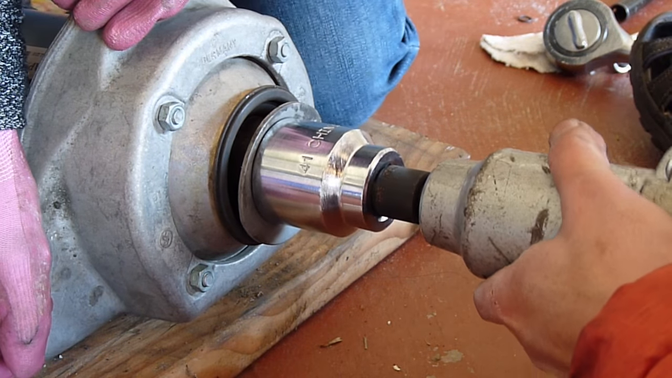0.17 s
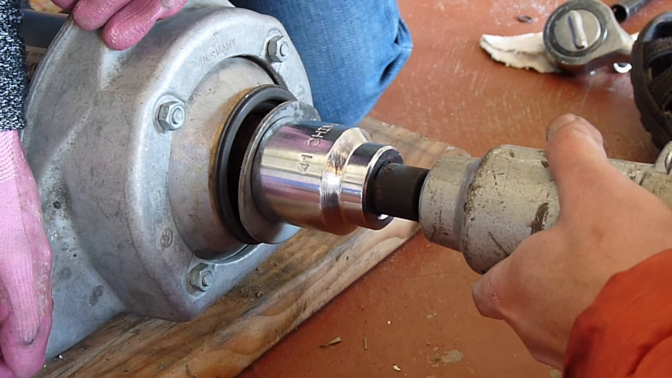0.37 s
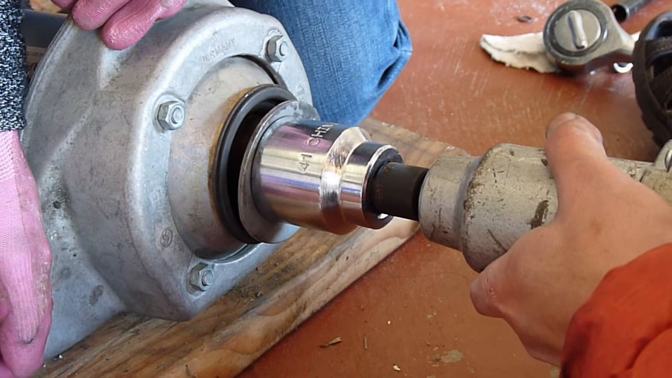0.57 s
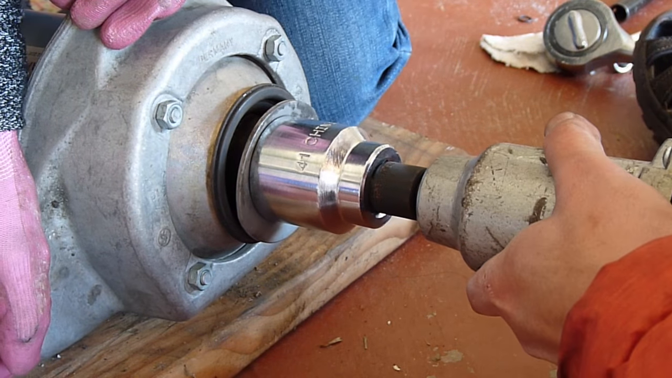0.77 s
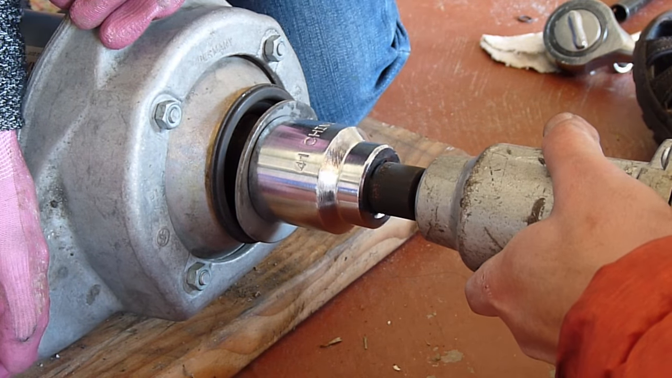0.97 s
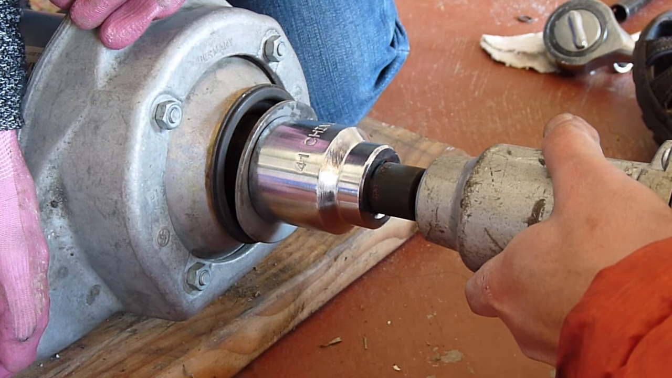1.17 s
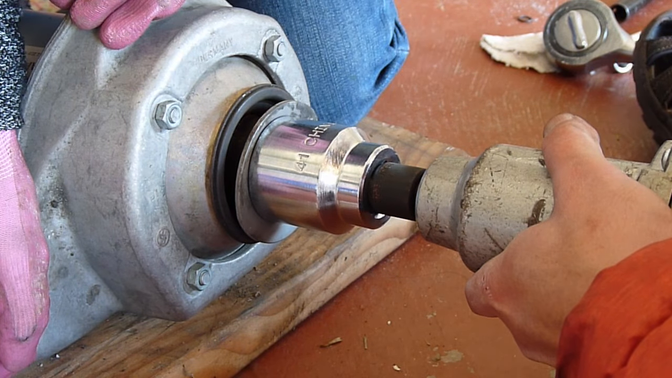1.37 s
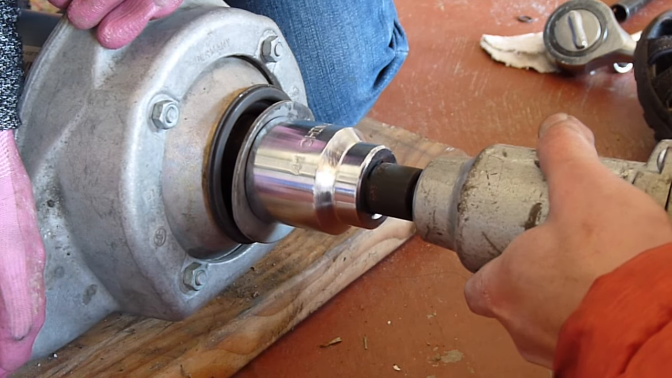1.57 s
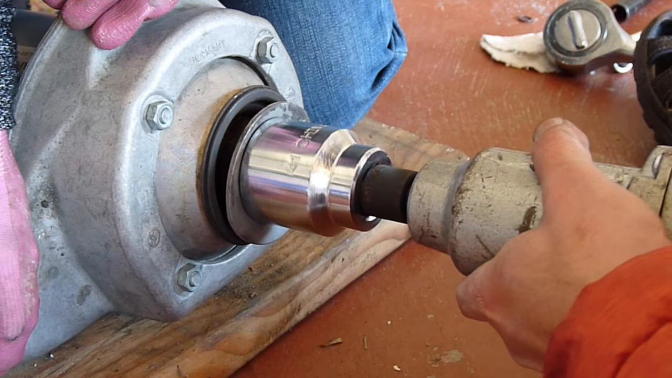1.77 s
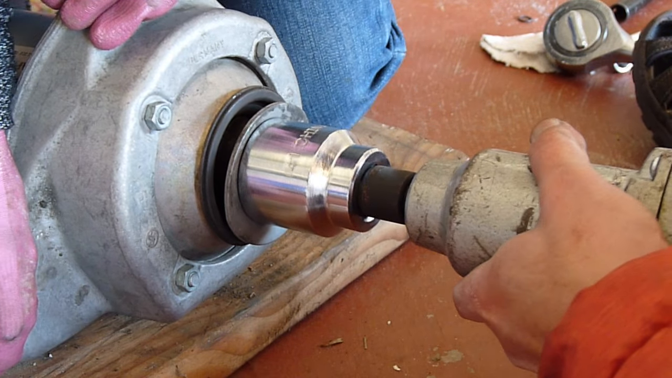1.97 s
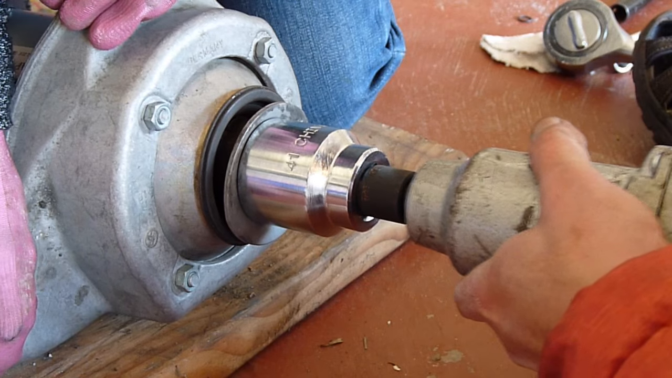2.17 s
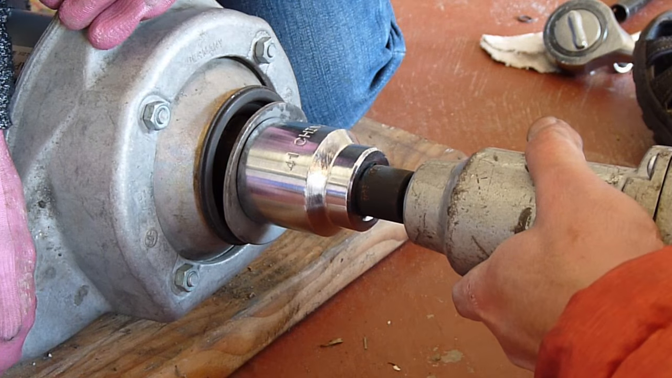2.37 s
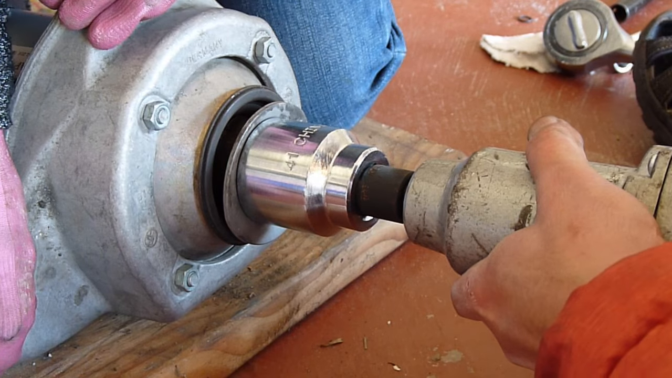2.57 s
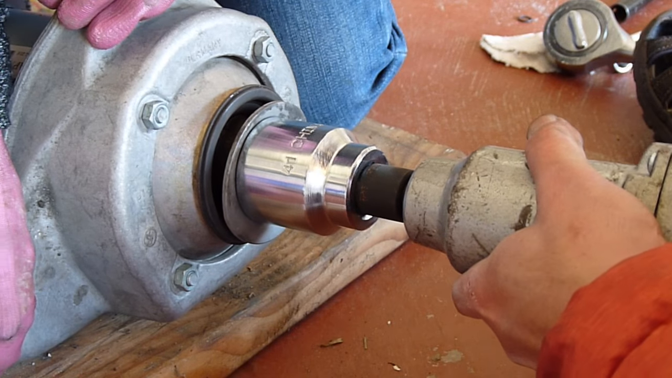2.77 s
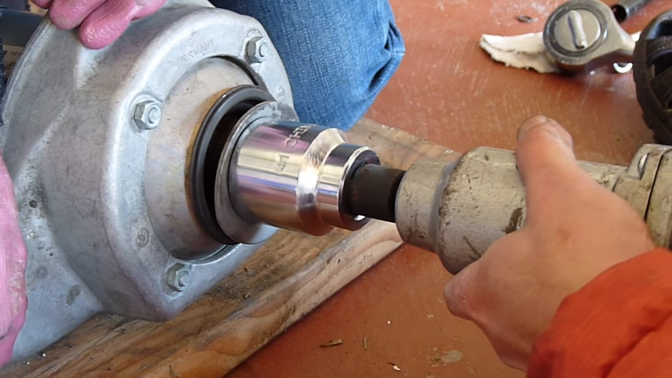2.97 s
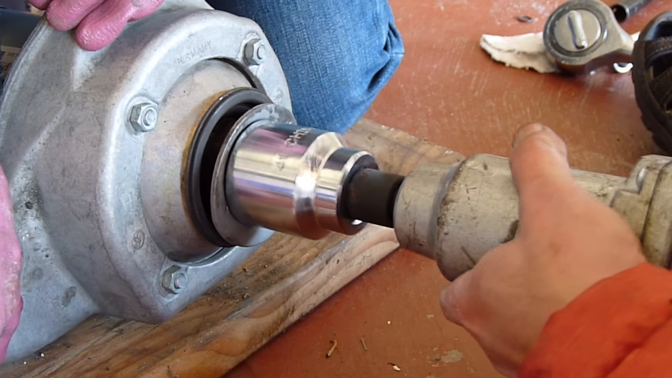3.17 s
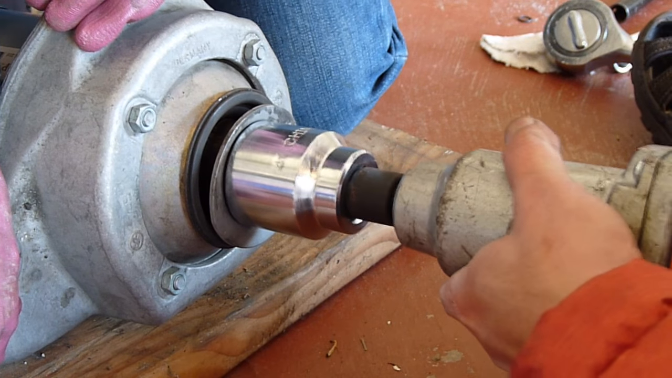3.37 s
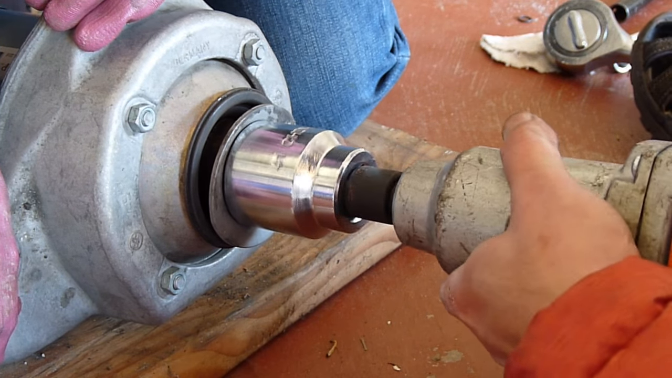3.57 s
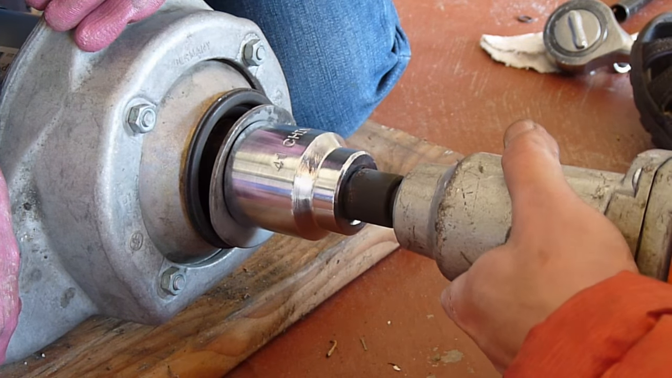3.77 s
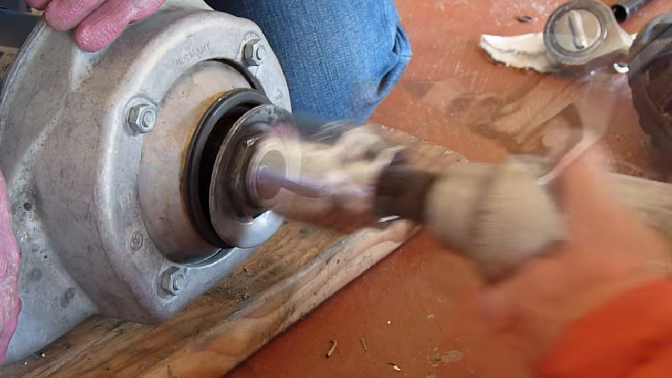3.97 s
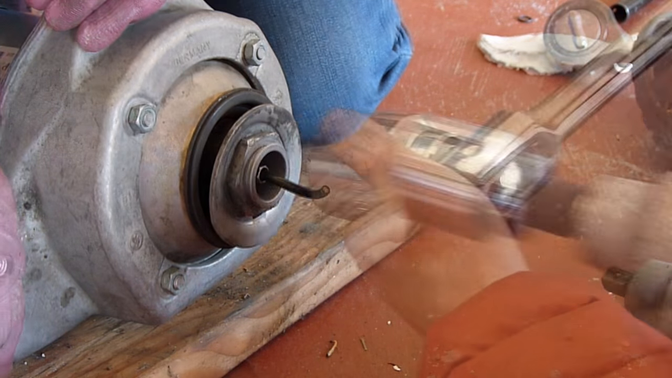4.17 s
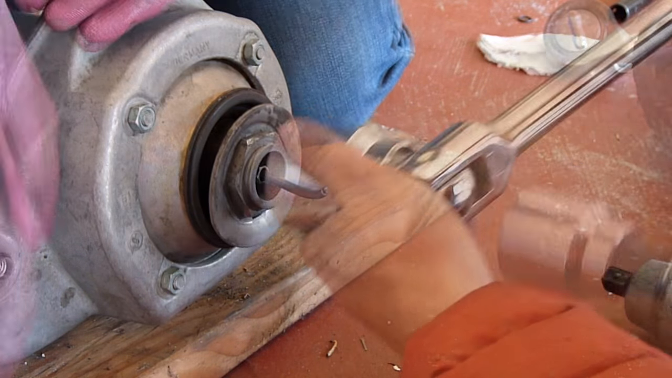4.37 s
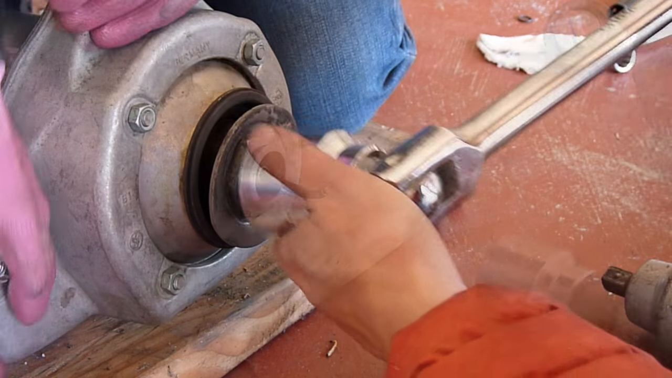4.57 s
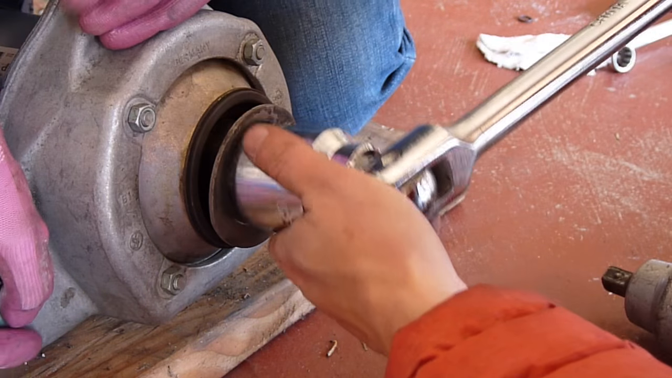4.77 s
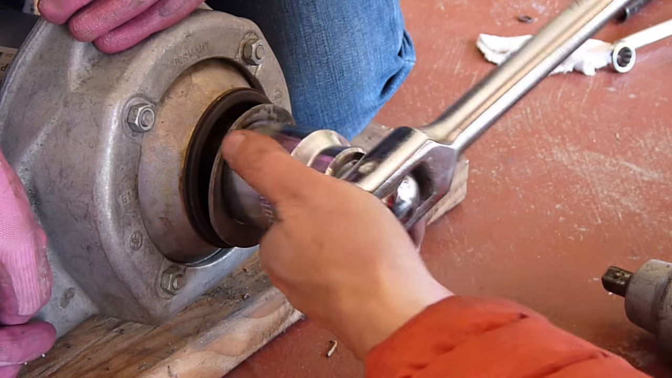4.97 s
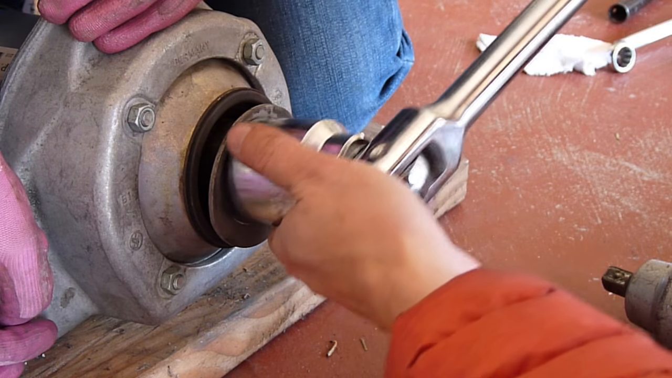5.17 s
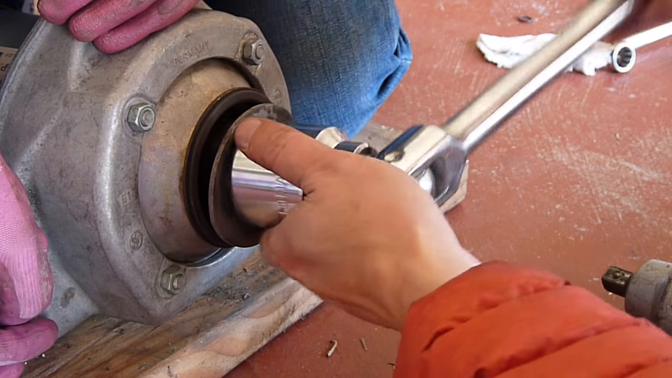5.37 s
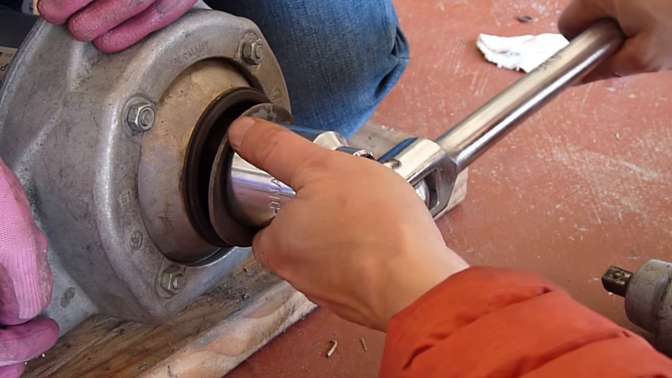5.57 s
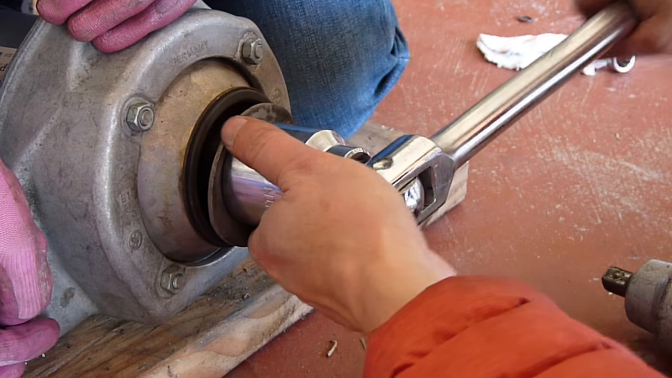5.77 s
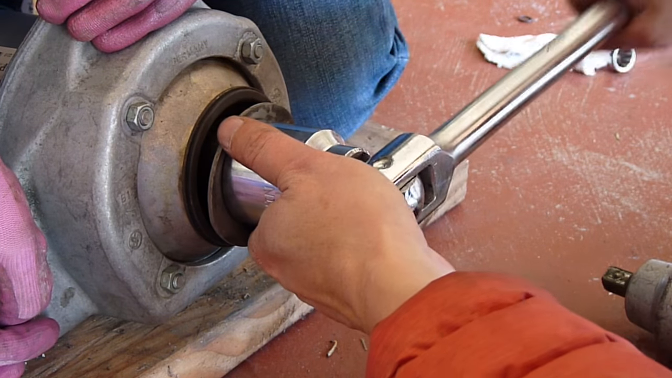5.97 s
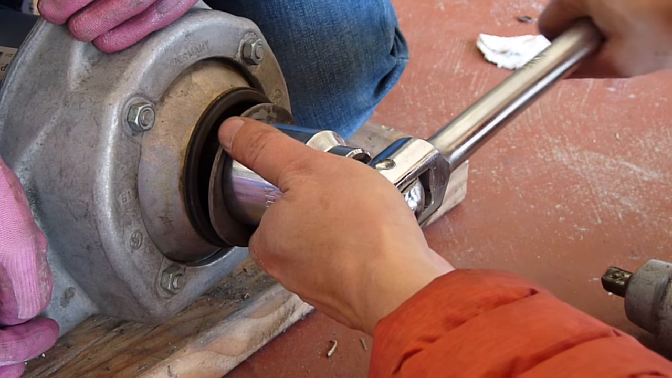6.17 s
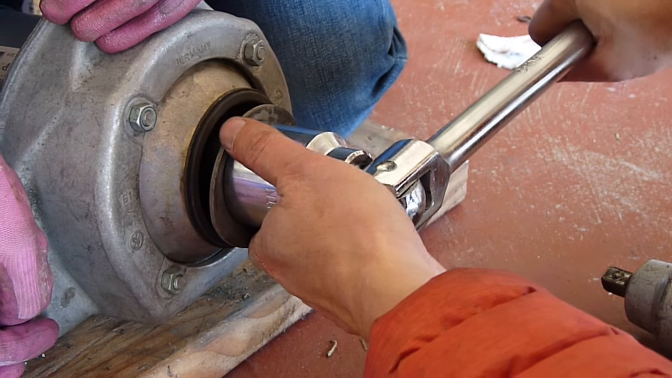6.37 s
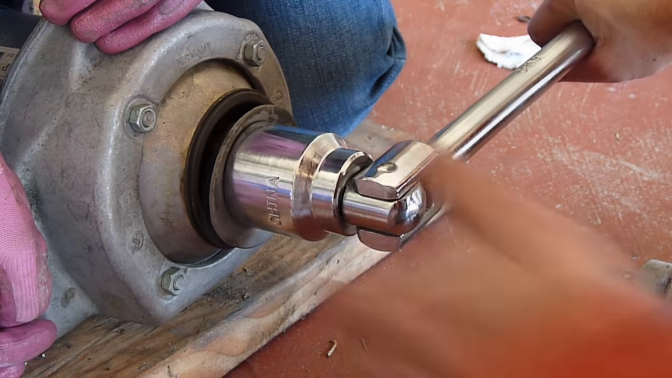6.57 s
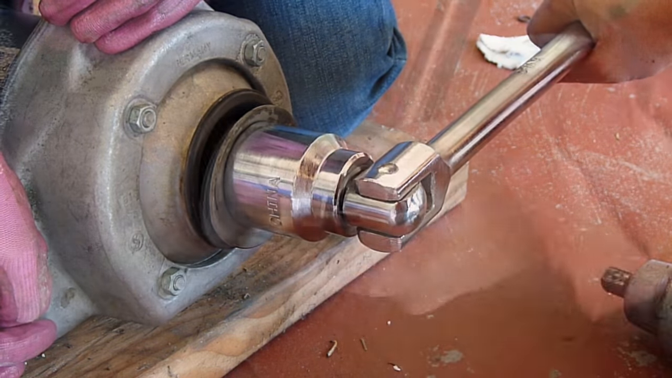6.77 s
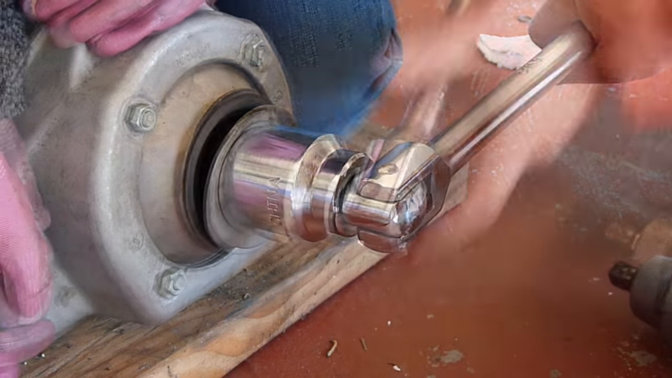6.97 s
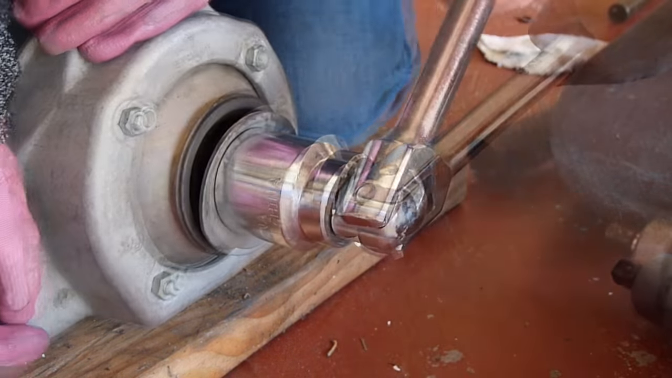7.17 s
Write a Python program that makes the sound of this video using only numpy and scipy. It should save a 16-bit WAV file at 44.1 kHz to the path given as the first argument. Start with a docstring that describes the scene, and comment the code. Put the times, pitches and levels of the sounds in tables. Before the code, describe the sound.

An impact wrench hammers a large nut in two slowing bursts, then a socket on a steel bar clicks lightly.

```python
"""Impact wrench and hand socket

An impact wrench hammers the big nut of a cast gear housing in two bursts, each running down to
single knocks. A socket on a hinged bar is then fitted and clicks as it turns; a sleeve rustles.
A rumble of distant traffic ducks as the wrench starts and ends in a low thud.
The small, dull microphone thumps with each blow and chokes on the hardest."""
import sys
import numpy as np
from scipy import signal
from scipy.fft import rfft, irfft
from scipy.io import wavfile
from scipy.ndimage import uniform_filter1d

SR = 44100
rng = np.random.default_rng(int(sys.argv[2]) if len(sys.argv) > 2 else 0)


def file_out(sig):
    """Save sig as 16-bit WAV at sys.argv[1]."""
    # one column per channel
    cols = np.atleast_2d(sig).T
    # limit, then scale
    lim = np.clip(cols, -1, 1)
    pcm = np.round(lim * 32767).astype(np.int16)
    wavfile.write(sys.argv[1], SR, pcm)


N = 319217
TIME_S = np.arange(N) / SR
FULL_RATE_HZ, STALL_RATE_HZ = 45, 6.2  # blows per second

# trigger pulls (pressed [s], first blow [s], released [s], hammer lets go [s],
# top blow rate [Hz], friction [Hz/s])
TRIGGER_PULLS = [(1.47, 1.5991, 1.7401, 2.5, 45.27, 26.26), (2.7314, 2.7741, 3.0963, 3.66, 46.04, 24.08)]
# pressure of tool on nut, per pull (gain [dB])
PRESS_GAINS = [0.35, -0.92]
# motor start (time [s], level [dB], whine [Hz])
MOTOR_START = [(1.481, -60.5, 1515), (1.5, -43, 1943), (1.512, -30.5, 2013), (1.54, -27.5, 2060),
               (1.558, -27.5, 2165), (1.567, -49, 2080), (1.59, -60.5, 2130)]
# loose socket flung against the nut (time [s], relative knock [dB], relative tick [dB])
SOCKET_CLACKS = [(1.503, -32.5, -57), (1.5175, -29.5, -48.5), (1.5285, -27.5, -43.5), (1.5555, -29, -47.5),
                 (1.5607, -40, -36)]
# socket and hinged bar (time [s], relative knock [dB], relative tick [dB])
BAR_CLICKS = [(4.7382, -41.5, -52.5), (4.8312, -38, -53), (4.846, -45, -63), (4.868, -49.5, -56),
              (5.018, -44, -66.5), (5.039, -49, -68), (5.0523, -24, -39.5), (5.0605, -36, -50),
              (5.0682, -40, -49.5), (5.171, -40, -66), (5.242, -39, -59.5), (5.368, -49.5, -78),
              (5.38, -48, -76), (5.4145, -44.5, -57), (5.477, -41.5, -65), (5.549, -49, -53.5),
              (5.5605, -40, -62), (5.72, -41, -71.5), (5.773, -45, -71), (5.9145, -45.5, -53.5),
              (6.004, -51.5, -79), (6.133, -49, -70), (6.143, -41.5, -53), (6.411, -51, -74),
              (7.1155, -51, -70), (7.191, -55, -76), (7.215, -51, -75)]
# arm moves (start [s], fastest [s], end [s], sleeve [dB], sliding steel [dB])
ARM_MOVES = [(4.188, 4.37, 4.5, -61.5, -77), (4.426, 4.598, 4.98, -60.5, -64),
             (5.06, 5.148, 5.45, -58, -72), (6.527, 6.742, 6.86, -52, -61), (6.703, 6.886, 7.03, -53, -77),
             (7.09, 7.205, 7.3, -59.5, -71)]
# microphone overloads (time [s], depth [0-1])
OVERLOADS = [(1.7084, .4), (1.7334, 1), (2.94, 1), (3.181, 1), (3.239, 0.33)]

# ringing modes (frequency [Hz], relative level [dB], t60 [s])
SOCKET_MODES = [(380, -15, 0.98), (472, -2, 0.13), (600, -20.5, 0.13), (724, -12, 0.098),
                (870, -6.5, 0.083), (1368, -5, 0.11), (1550, -11.5, .15), (2000, 7, 0.069), (2190, 6, 0.22),
                (2550, -5.5, .13), (2960, -4.5, .1), (4650, 1, 0.1)]  # socket, nut and housing
BAR_MODES = [(337.4, -6, 0.4), (595, -7, 0.19), (764, -3, 0.24), (944, -1.5, 0.25), (1100, -7.5, .14),
             (1475, 3.5, 0.12), (2060, -3, .1), (2350, -3, .05), (2920, -0.5, .12)]  # bar and its socket
# room decay (frequency [Hz], t60 [s])
ROOM_DECAY = [(100, 0.43), (500, 0.35), (1500, 0.35), (3000, 0.35), (6000, 0.25)]

# spectra (frequency [Hz], relative density [dB])
CRACK_SPECTRUM = [(100, -6.5), (300, -2), (600, 0.5), (1000, -1.5), (1500, -5), (2200, -4.5), (2600, -7),
                  (3000, -9), (3450, -16), (3800, -24), (4400, -27.5), (5200, -34), (7000, -45.5)]
GEAR_SPECTRUM = [(150, -33.5), (250, -4.5), (462, -2), (602, 2), (953, -4.5), (1310, -5), (1450, -6),
                 (2230, -6.5), (2600, -14.5), (2950, -14), (3690, -29.5), (4360, -31), (7000, -48.5),
                 (9100, -82.5), (15400, -120)]
CLATTER_SPECTRUM = [(88, -37.5), (150, -8.5), (281, -31), (420, 10), (627, -9), (880, 3.5), (1250, -10.5),
                    (1540, -5.5), (2030, -5.5), (7000, -52), (9100, -80), (15400, -120)]
KNOCK_SPECTRUM = [(60, -38.5), (150, -15.5), (240, -4.5), (330, 1.5), (480, -0.5), (640, 1), (850, -4),
                  (1450, -13.5), (2000, -32), (3200, -44.5), (7000, -59)]
TICK_SPECTRUM = [(200, -36.5), (1000, -6.5), (1700, -3.5), (2100, -0.5), (2600, -6.5), (3050, -6),
                 (3350, -16), (3700, -21), (5000, -24.5), (7000, -35.5)]
SLEEVE_SPECTRUM = [(80, -9), (250, -0.5), (500, -3), (900, -8), (1500, -9), (2000, -16.5), (3500, -34),
                   (7000, -44)]
RUMBLE_SPECTRUM = [(25, -23), (50, -12.5), (85, -3), (130, 1.5), (200, -1), (300, -6), (480, -8.5),
                   (650, -7.5), (800, -9), (1000, -17.5), (1300, -19.5), (2000, -32), (4000, -46),
                   (7000, -66.5)]
HISS_SPECTRUM = [(100, 7), (500, 5), (1000, 4), (2000, 2), (3000, 1.5), (5000, .5), (7000, -1.2)]

# background rumble: ducks when the wrench starts, slowly recovers, ends in a low handling thud
# (time [s], level [dB])
RUMBLE_LEVELS = [(0, -41.5), (.6, -44), (1.45, -46), (1.7, -67), (2.6, -64), (4.1, -72), (4.7, -58),
                 (5.5, -57.5), (7.15, -60), (7.23, -50)]
# hiss with a brief dip (time [s], level [dB])
HISS_LEVELS = [(3.7, -68), (4, -71), (4.09, -76), (4.18, -71), (4.5, -67.6)]


def wrench(crack_db=-11, scatter_db=1.0, crack_s=0.0045, rebound_s=0.0125, lead_s=0.001215,
           ring_db=-25.5, room_db=-7):
    """Blows and gear churn ring the socket; the hammer rebounds once per blow, louder when slow."""
    blows, crack_response = np.zeros(N), colour(CRACK_SPECTRUM)
    for time_s, rate_hz, press_db in hammer_blows():
        slowness = FULL_RATE_HZ / rate_hz
        gain = amp(crack_db + press_db + scatter_db * rng.standard_normal()) * force(rate_hz)
        # a slow hammer drags over the anvil: stronger, longer crack
        gain *= slowness ** 0.26
        hit = 0, 0, crack_s * slowness ** 0.31
        rebound = rebound_s * slowness ** 0.58, 0.5 - 18.5 / slowness, crack_s
        for delay_s, level_db, decay_s in (hit, rebound):
            crack = unit_energy(through(chatter(rise_s=0.0004, decay_s=decay_s), crack_response))
            add(blows, time_s + delay_s - lead_s, gain * amp(level_db) * crack)
    steel = blows + gears()
    steel += amp(ring_db) * through(steel, ringing(SOCKET_MODES))
    return steel + amp(room_db) * room(steel)


def blow_rate_hz(pull, spin_up_s=0.1097, drag_per_s=1.62):
    """The motor spins up under the trigger, then coasts against friction and drag."""
    pressed_s, _, released_s, _, top_hz, friction_hz_per_s = pull
    held_s = np.clip(TIME_S, pressed_s, released_s) - pressed_s
    coast_s = np.maximum(TIME_S - released_s, 0)
    driven_hz = top_hz * (1 - np.exp(-held_s / spin_up_s))
    brake_hz = friction_hz_per_s / drag_per_s
    return np.maximum((driven_hz + brake_hz) * np.exp(-drag_per_s * coast_s) - brake_hz, 0)


def hammer_blows():
    """One blow per hammer turn: (time [s], rate [Hz], press gain [dB])."""
    for pull, press_db in zip(TRIGGER_PULLS, PRESS_GAINS):
        _, first_s, _, last_s, _, _ = pull
        rate_hz = blow_rate_hz(pull)
        turns = np.cumsum(rate_hz) / SR
        first_turn, last_turn = np.interp([first_s, last_s], TIME_S, turns)
        for time_s in np.interp(np.arange(first_turn, last_turn), turns, TIME_S):
            yield time_s, np.interp(time_s, TIME_S, rate_hz), press_db


def force(rate_hz):
    """Blow strength, 0-1: full until the hammer nears stall."""
    return 1 / (1 + (STALL_RATE_HZ / rate_hz) ** 3)


def blow_thumps(dip_db=-24.5, scatter_db=2, overload_db=4, width_s=0.0037,
                sag_db=-41, sag_s=0.011, settle_hz=5):
    """Each blow pushes the microphone: a low thump, deeper at speed, then a slow sag as it settles."""
    out, t = np.zeros(N), TIME_S[:SR // 10]
    dip = -np.sin(np.pi * np.minimum(t / width_s, 1)) ** 2
    sag = -t / sag_s * np.exp(1 - t / sag_s)
    for time_s, rate_hz, press_db in hammer_blows():
        overloads = any(abs(time_s - overload_s) < width_s for overload_s, _ in OVERLOADS)
        random_db = scatter_db * rng.standard_normal()
        level_db = dip_db + press_db + (overload_db if overloads else random_db)
        add(out, time_s - width_s / 2, amp(level_db) * (rate_hz / FULL_RATE_HZ) ** 1.31 * dip)
        add(out, time_s, amp(sag_db + press_db) * force(rate_hz) * sag)
    return signal.lfilter(*signal.butter(1, settle_hz, "high", fs=SR), out)


def gears(pull_levels_db=(-37.5, -41), fade_s=0.019, strain_db=-36, rise_s=0.019, strain_s=0.026):
    """Motor and gears strain at each start, then churn louder with speed."""
    gain = np.zeros(N)
    for pull, level_db in zip(TRIGGER_PULLS, pull_levels_db):
        pressed_s, _, _, last_s, _, _ = pull
        age_s = np.maximum(TIME_S - pressed_s, 0)
        gain += amp(strain_db) * (1 - np.exp(-(age_s / rise_s) ** 4)) * np.exp(-age_s / strain_s)
        fade = np.exp(-np.maximum(TIME_S - last_s, 0) / fade_s)
        gain += amp(level_db) * (blow_rate_hz(pull) / FULL_RATE_HZ) ** 0.99 * fade
    return gain * grainy(GEAR_SPECTRUM, grain_db=4.5, grain_hz=250)


def motor_start(whine_db=-10, clatter_db=-2, room_db=-14):
    """First pull: the motor jerks up with a ragged whine while the socket clatters."""
    times_s, _, pitches_hz = np.transpose(MOTOR_START)
    whine_hz = np.interp(TIME_S, times_s, pitches_hz) * (1 + 0.04 * wander(120))
    whine = tone(whine_hz) * wander(60)
    clatter = grainy(CLATTER_SPECTRUM, grain_db=4, grain_hz=199)
    out = envelope(MOTOR_START) * (amp(clatter_db) * clatter + amp(whine_db) * whine)
    return out + amp(room_db) * room(out)


def strikes(rows, modes, knock_gain_db, tick_gain_db, ring_db, room_db,
            contact_s=0.0018, longest_s=0.0035, hard_s=0.0012):
    """Steel on steel: dull knock, bright tick, short ring."""
    knock, tick = colour(KNOCK_SPECTRUM), -colour(TICK_SPECTRUM)
    out = np.zeros(N)
    for time_s, knock_db, tick_db in rows:
        # weaker tick, longer contact: tenfold per 28 dB
        spread_s = min(contact_s * 10 ** ((-55 - tick_db) / 28), longest_s)
        # square hit: one impulse; glancing hit: a swarm
        hardness = np.exp(-(spread_s / hard_s) ** 2)
        contact = (1 - hardness) * chatter(rise_s=spread_s, decay_s=spread_s + 0.00093)
        contact[0] -= hardness
        add(out, time_s, amp(knock_db + knock_gain_db) * unit_energy(through(contact, knock)))
        add(out, time_s, amp(tick_db + tick_gain_db) * unit_energy(through(contact, tick)))
    out += amp(ring_db) * through(out, ringing(modes))
    return out + amp(room_db) * room(out)


def chatter(rise_s, decay_s):
    """Steel faces rebound in a dying swarm of contacts."""
    t = TIME_S[:SR // 8]
    return unit_energy(rng.standard_normal(len(t)) * (1 - np.exp(-t / rise_s)) * np.exp(-t / decay_s))


def ringing(modes):
    """Impulse response of damped steel modes."""
    t = TIME_S[:SR // 2]
    return unit_energy(sum(amp(db) * np.exp(-np.log(1000) * t / t60_s) * np.sin(2 * np.pi * hz * t)
                           for hz, db, t60_s in modes))


def handling(start_db=-16, end_db=-11.5):
    """The sleeve swishes with each arm move; steel slides on steel with finer grit."""
    cloth = grainy(SLEEVE_SPECTRUM, grain_db=3.0, grain_hz=95)
    slide = grainy(TICK_SPECTRUM, grain_db=3.5, grain_hz=300)
    out = np.zeros(N)
    for start_s, fastest_s, end_s, sleeve_db, slide_db in ARM_MOVES:
        swell = envelope([(start_s, start_db), (fastest_s, 0), (end_s, end_db)])
        out += swell * (amp(sleeve_db) * cloth + amp(slide_db) * slide)
    return out


def rumble():
    """Distant traffic roar and wavering engine drone; the level ducks, recovers, ends in a thud."""
    drone_hz = np.interp(TIME_S, [0, 1.1, 1.35, 7.2], [92, 93, 108, 111]) * (1 + 0.025 * wander(12))
    drone = tone(drone_hz) * amp(-5 + 2 * wander(5))
    roar = grainy(RUMBLE_SPECTRUM, grain_db=1, grain_hz=7.6)
    return amp(np.interp(TIME_S, *np.transpose(RUMBLE_LEVELS))) * (roar + drone)


def room(x, tails=3, crossfade_hz=2):
    """Short, smooth room reverberation from several cross-faded tails."""
    phase = 2 * np.pi * crossfade_hz * TIME_S
    wet = sum(through(x * np.cos(phase + np.pi * k / tails), room_tail()) for k in range(tails))
    return wet * np.sqrt(2 / tails)


def room_tail(taps_per_s=3000, gap_s=0.004):
    """Sparse reflections of random sign; each band decays at its own rate."""
    taps = rng.choice([-1., 1.], SR) * (rng.random(SR) < taps_per_s / SR) * (TIME_S[:SR] > gap_s)
    hz, t, bands = signal.stft(taps, SR, nperseg=256)
    decay = np.exp(-np.log(1000) * t / at_hz(ROOM_DECAY, hz)[:, None])
    return unit_energy(signal.istft(bands * decay, SR, nperseg=256)[1])


def microphone_choke(x, deaf_s=0.0065, swing_s=0.001, swing_db=-22):
    """The hardest blows pin the microphone: briefly deaf while it swings back."""
    deafness, swing, t = np.zeros(N), np.zeros(N), TIME_S[:SR // 50]
    for time_s, depth in OVERLOADS:
        add(deafness, time_s, depth * np.exp(-(t / deaf_s) ** 6))
        add(swing, time_s, depth * amp(swing_db) * (t / swing_s) ** 2 * np.exp(-t / swing_s))
    return x * (1 - np.clip(uniform_filter1d(deafness, 30), 0, 1)) + swing


def grainy(spectrum, grain_db, grain_hz):
    """Coloured noise in small clumps, rms 1."""
    clumps = rng.standard_normal(N) * amp(grain_db * wander(grain_hz))
    return unit_rms(through(clumps, colour(spectrum)))


def wander(cutoff_hz):
    """Low-passed random drift, rms 1."""
    lowpass = np.exp(-(np.fft.rfftfreq(N, 1 / SR) / cutoff_hz) ** 2)
    return unit_rms(irfft(rfft(rng.standard_normal(N)) * lowpass, N))


def colour(spectrum, size=8192):
    """Minimum-phase impulse response of a spectrum, energy 1."""
    log_gain = np.log(amp(at_hz(spectrum, abs(np.fft.fftfreq(size, 1 / SR)))))
    response = np.fft.ifft(np.exp(np.conj(signal.hilbert(log_gain)))).real
    return unit_energy(response[:size // 2])


def at_hz(rows, hz):
    """Interpolates (frequency [Hz], value) rows on a log axis."""
    knots_hz, values = np.transpose(rows)
    return np.interp(np.log(hz + 1), np.log(knots_hz + 1), values)


def envelope(rows):
    """Gain along (time [s], level [dB]) rows, zero outside."""
    times_s, levels_db = np.transpose(rows)[:2]
    return amp(np.interp(TIME_S, times_s, levels_db)) * (TIME_S >= times_s[0]) * (TIME_S <= times_s[-1])


def tone(hz):
    return np.sin(2 * np.pi * np.cumsum(hz) / SR)


def add(mix, time_s, sound):
    part = mix[round(time_s * SR):][:len(sound)]
    part += sound[:len(part)]


def through(x, response):
    return signal.oaconvolve(x, response)[:len(x)]


def amp(db):
    return 10 ** (np.asarray(db) / 20)


def unit_rms(x):
    return x / np.sqrt(np.mean(x ** 2) + 1e-20)


def unit_energy(x):
    return x / np.linalg.norm(x)


def scene():
    """Wrench, then hand tool, over the rumble; mono."""
    clacks = strikes(SOCKET_CLACKS, SOCKET_MODES, knock_gain_db=25, tick_gain_db=25,
                     ring_db=-27, room_db=-14)
    clicks = strikes(BAR_CLICKS, BAR_MODES, knock_gain_db=26, tick_gain_db=26.5,
                     ring_db=-24, room_db=-11)
    power_tool = microphone_choke(wrench()) + blow_thumps() + motor_start() + clacks
    hand_tool = clicks + handling()
    return (power_tool + hand_tool + rumble())[None]


def record(dry, whistle_db=-86, whistle_hz=6660, dc_offset=-0.0059, cutoff_hz=7130):
    """Recorder: hiss, faint whistle, DC offset, then low-pass."""
    hiss = unit_rms(through(rng.standard_normal(N), colour(HISS_SPECTRUM)))
    hiss *= amp(np.interp(TIME_S, *np.transpose(HISS_LEVELS)))
    whistle = amp(whistle_db) * np.sin(2 * np.pi * whistle_hz * TIME_S)
    lowpass = signal.firwin(255, cutoff_hz, window=("kaiser", 8), fs=SR)
    return signal.oaconvolve(dry + hiss + whistle + dc_offset, lowpass[None], "same")


dry = scene()
out = record(dry)
file_out(out)
```